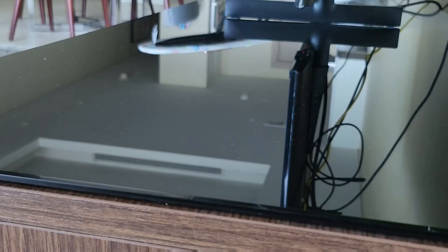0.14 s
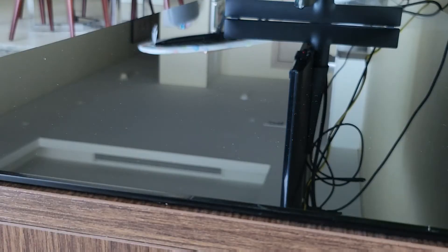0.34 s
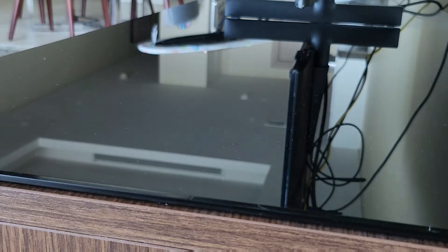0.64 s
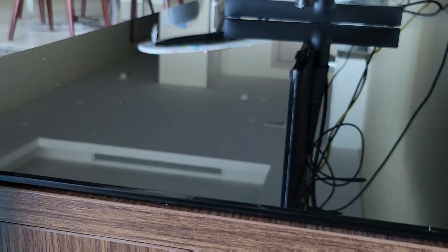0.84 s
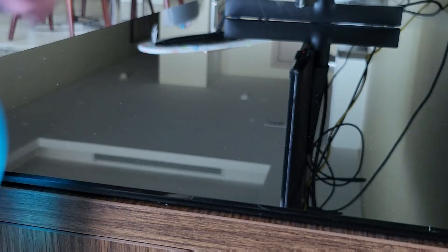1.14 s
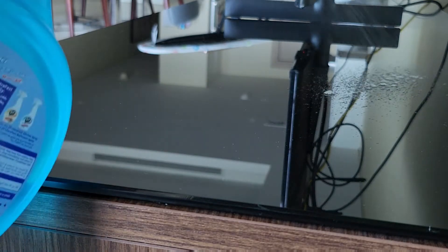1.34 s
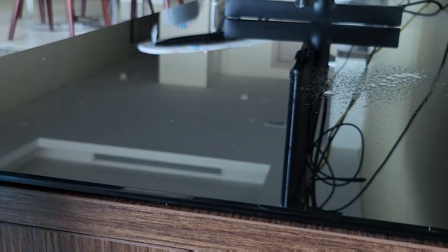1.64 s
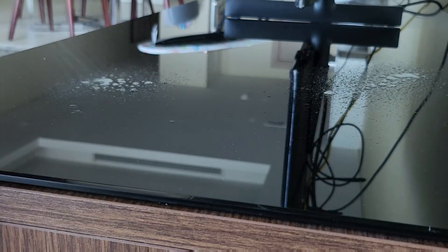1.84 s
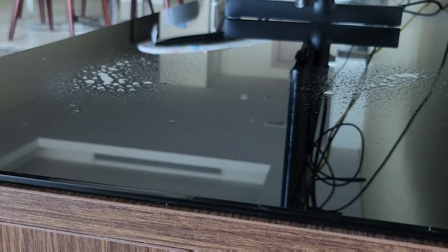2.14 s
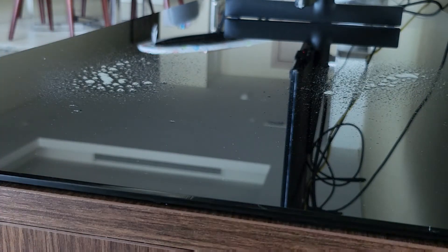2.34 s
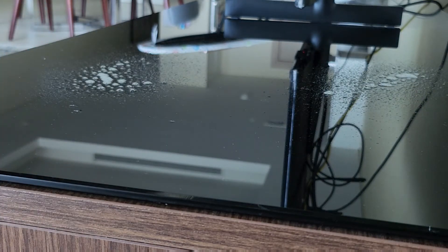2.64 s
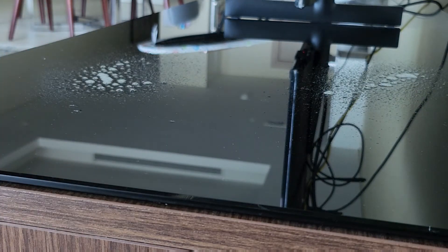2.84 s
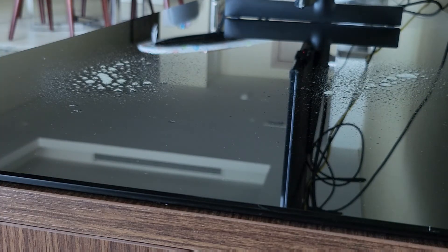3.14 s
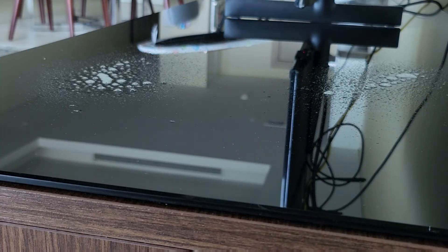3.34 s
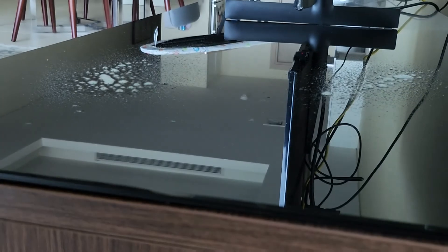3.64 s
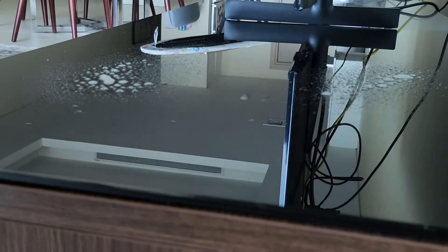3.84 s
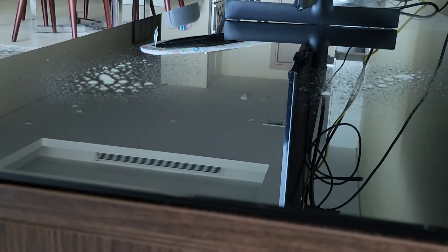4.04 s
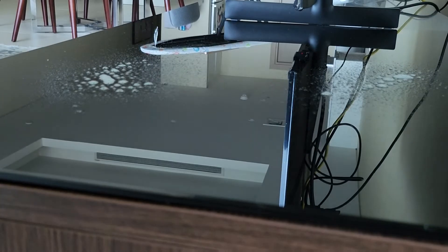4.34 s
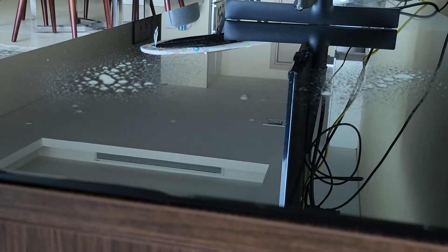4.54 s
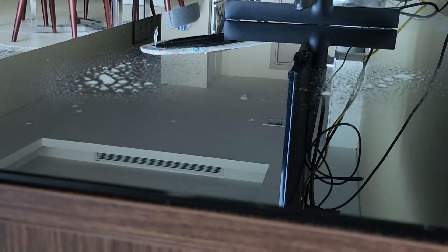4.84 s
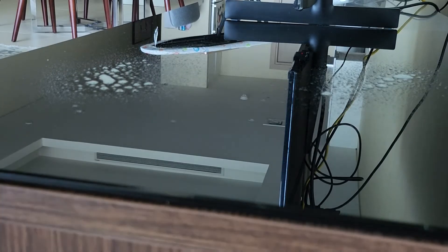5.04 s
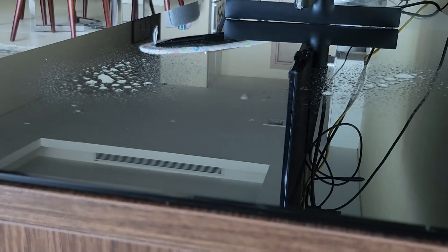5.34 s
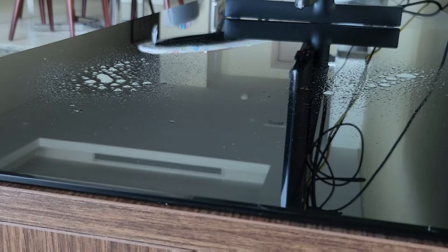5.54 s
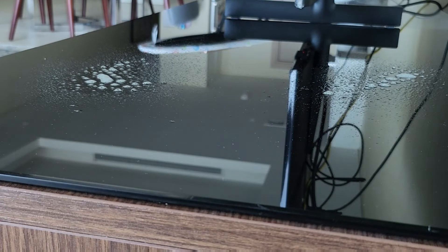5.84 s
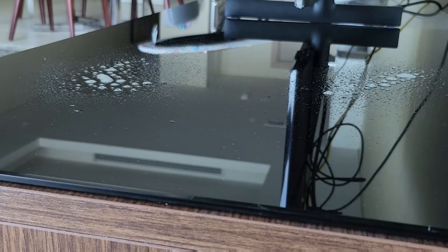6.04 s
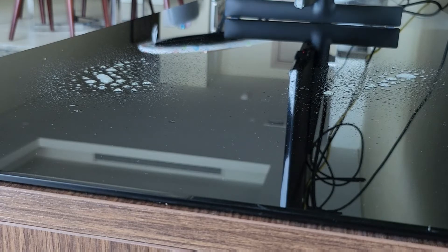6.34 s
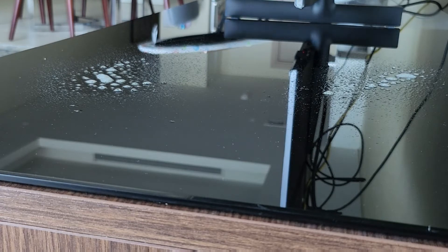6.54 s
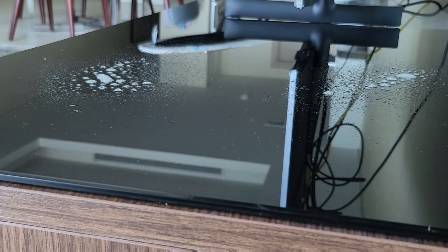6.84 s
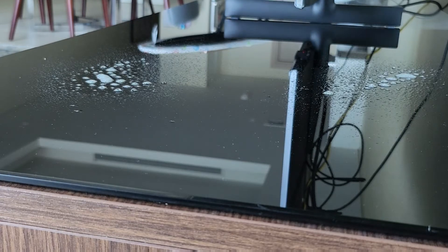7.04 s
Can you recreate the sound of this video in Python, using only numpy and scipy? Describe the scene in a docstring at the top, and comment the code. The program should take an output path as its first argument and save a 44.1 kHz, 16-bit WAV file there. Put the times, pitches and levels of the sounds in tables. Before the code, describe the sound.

A trigger spray bottle spritzes a glass top twice, slightly to the left, its plastic lever clacking back after each hiss. Something crinkly is then handled on the right, with small snaps and pops. Two hollow knocks boom through a piece of furniture, the second with a short rattle. Faint clothing rustle and a low machine hum fill the small room, heard from close by.

```python
"""A small room, where a machine hums low throughout. On the left, a trigger bottle sprays a glass top
twice: the mist is turbulent noise, and the lever clacks back after each stroke. On the right, something
crinkly is handled, its folds and panels buckling in snaps and pops. Two knocks then excite the modes
of the furniture, which booms. Clothes rustle faintly by friction, and the walls add a short echo."""
import sys
import numpy as np
from scipy import signal
from scipy.fft import rfft, irfft, next_fast_len
from scipy.io import wavfile
from scipy.ndimage import uniform_filter1d

SR = 44100
rng = np.random.default_rng(int(sys.argv[2]) if len(sys.argv) > 2 else 0)


def digitize_waveform(pressure):
    """Quantize a signal to 16-bit integers and store it at the path in sys.argv[1].

    Rows of a 2-D input are taken as channels; values are limited to [-1, 1].
    """
    field = np.atleast_2d(pressure).T
    bounded = np.clip(field, -1, 1)
    quanta = np.round(bounded * 32767).astype(np.int16)
    wavfile.write(sys.argv[1], SR, quanta)


N = 317888
TIME = np.arange(N) / SR


def gain_of(db):
    """Amplitude ratio of a level in decibels."""
    return 10 ** (np.asarray(db) / 20)


def unit_rms(x):
    """Normalisation to an rms of 1."""
    return x / np.sqrt(np.mean(x ** 2) + 1e-20)


def curve_at(points, hz):
    """Interpolation on a log-frequency axis."""
    f, value = np.transpose(points)
    return np.interp(np.log(hz + 1), np.log(f + 1), value)


def add(mix, s, sound):
    """Superposition of a sound starting at s seconds."""
    part = mix[round(s * SR):][:len(sound)]
    part += sound[:len(part)]


def coloured_noise(spectrum):
    """Spectral shaping of white noise, at unit rms."""
    size = next_fast_len(N)
    response = gain_of(curve_at(spectrum, np.fft.rfftfreq(size, 1 / SR)))
    return unit_rms(irfft(rfft(rng.standard_normal(N), size) * response, size)[:N])


def blotches(shape, rows, columns):
    """A random field, correlated by a moving average along both axes."""
    field = uniform_filter1d(rng.standard_normal(shape), size=rows, axis=0)
    return unit_rms(uniform_filter1d(field, size=columns, axis=1))


def mode(hz, t60, rise_s):
    """Damped oscillation with a soft onset; t60 is the time to decay by 60 dB."""
    t60 = max(t60, .004)
    t = TIME[:round(t60 * SR)]
    return gain_of(-60 * t / t60) * (1 - np.exp(-t / rise_s)) * np.sin(2 * np.pi * hz * t)


def taps(rows, rise_s, scrape_s):
    """Forced response of single modes, each driven by a brief scrape of noise."""
    out = np.zeros(N)
    for s, db, hz, t60 in rows:
        scrape = rng.standard_normal(300) * gain_of(-60 * TIME[:300] / scrape_s)
        scrape /= np.linalg.norm(scrape)
        add(out, s, gain_of(db) * signal.fftconvolve(mode(hz, t60, rise_s), scrape))
    return out


def placed(x, pan_db, lead_s=0):
    """Level and time differences: the left channel is louder by pan_db and earlier by lead_s."""
    return np.array([x * gain_of(pan_db / 2), np.roll(x, round(lead_s * SR)) / gain_of(pan_db / 2)])


def swell(start, rise, hold, fall, db, sag_db=0, depth_db=30):
    """Exponential rise, sag and fall of an envelope, offset to end at zero."""
    corners = start + np.cumsum([0, rise, hold, fall])
    line_db = np.interp(TIME, corners, [-depth_db, 0, -sag_db, -sag_db - depth_db])
    floor = gain_of(-depth_db - max(sag_db, 0))
    return gain_of(db) * np.maximum(gain_of(line_db) - floor, 0) * (TIME > start)


def rubs(rows):
    """Envelope, second-band level and pan of a series of friction strokes."""
    start, rise, _, _, band_db, pan_db = np.transpose(rows)
    level = sum(swell(s, up, 0, down, db) for s, up, down, db, _, _ in rows)
    return level, np.interp(TIME, start + rise, band_db), np.interp(TIME, start + rise, pan_db)


def grains(per_s, spread_db):
    """Shot noise: an envelope that jumps at random instants and quickly relaxes."""
    jumps = gain_of(spread_db * np.minimum(rng.exponential(1, N), 3)) * (rng.random(N) < per_s / SR)
    return unit_rms(1 + signal.lfilter([1], [1, -np.exp(-1 / (0.00034 * SR))], jumps))


def hiss(level, band_db, pan_db, bursts, main_band, second_band,
         per_s, spread_db, lead_s, coherence, patchy_db, shadow_db):
    """Amplitude-modulated noise in two bands, with bursts, partly coherent between the microphones."""
    main_level = level * grains(per_s, spread_db)
    t, sudden = TIME[:SR // 4], np.zeros(N)
    for s, db, length in bursts:
        attack = np.minimum(t / (.2 * length + .0004), 1)
        add(sudden, s, gain_of(db - 60 * (t / length) ** 2.5) * attack)
    main_level += sudden * grains(per_s=1500, spread_db=3.5)  # each burst is a clump of snaps
    second_level = gain_of(band_db) * (level + 0.44 * sudden)  # smoother, and thin in bursts
    direct, left, right = (main_level * coloured_noise(main_band)
                           + second_level * coloured_noise(second_band) for _ in range(3))
    scattered = placed(np.ones(N), pan_db) * [left, right]
    pair = coherence * placed(direct, pan_db, lead_s) + np.sqrt(1 - coherence ** 2) * scattered
    hz, _, spectra = signal.stft(pair, SR, nperseg=128)
    shadow = shadow_db * np.log2(hz / 4000 + 0.1)[:, None] / 2  # the housing shades one side's treble
    spectra *= gain_of(patchy_db * blotches(spectra.shape[1:], 5, 6) + np.array([shadow, -shadow]))
    return signal.istft(spectra, SR, nperseg=128)[1][:, :N]


# Background spectrum (frequency [Hz], relative density [dB])
AIR_SPECTRUM = [(88, -57), (150, -28), (179, -0.5), (231, -0.5), (254, -10.5), (303, -7), (376, -13.5),
                (457, -8), (624, -14.5), (774, -18.5), (1310, -32), (3420, -40), (4000, -42),
                (12700, -42.5), (16000, -46.5)]
# Likeness of the room's sound at the two microphones (frequency [Hz], correlation [ratio])
ROOM_COHERENCE = [(60, -0.11), (180, 0.9), (550, 0.55), (1650, -0.74), (4970, -0.16), (15000, -0.032)]
# Balance of the background (frequency [Hz], left over right [dB])
AIR_PAN = [(60, 2.5), (240, 3), (950, -8), (3770, 2), (15000, -3)]
def room_air(level_db=-62):
    """Partly coherent ambient noise: a low, drifting wash under a thin hiss."""
    hz = np.fft.rfftfreq(1024, 1 / SR)
    drift = blotches((N // 256 + 5, 513), 30, 6).T
    shared, apart = (signal.stft(coloured_noise(AIR_SPECTRUM), nperseg=1024, noverlap=768)[2]
                     for _ in range(2))
    coherence = curve_at(ROOM_COHERENCE, hz)[:, None]
    pan = gain_of(curve_at(AIR_PAN, hz) / 2)[:, None]
    right = coherence * shared + np.sqrt(1 - coherence ** 2) * apart
    spectra = np.array([shared * pan, right / pan]) * gain_of(1.9 * drift[:, :shared.shape[1]])
    return gain_of(level_db) * unit_rms(signal.istft(spectra, nperseg=1024, noverlap=768)[1][:, :N])


# Swelling and sinking of the rumble (time [s], level [dB])
RUMBLE_LEVEL = [(0.0, -49.5), (0.6, -55.5), (0.92, -51), (1.7, -49.5), (2.11, -56.5), (2.67, -50.5),
                (3.17, -54), (4.73, -50.5), (4.83, -53.5), (6.88, -52.5), (7.2, -53)]
# Rumble spectrum (frequency [Hz], relative density [dB])
RUMBLE_SPECTRUM = [(21, -25.5), (35, 2.5), (102, -1.5), (114, -9), (130, -9.5), (150, -14), (200, -50.5),
                   (330, -120)]
def rumble():
    """Long wavelengths: deep noise reaches both microphones almost in phase."""
    shared, apart = (coloured_noise(RUMBLE_SPECTRUM) for _ in range(2))
    level = gain_of(np.interp(TIME, *np.transpose(RUMBLE_LEVEL)))
    return placed(level * shared, pan_db=-1.5) + 0.17 * level * apart * [[1], [-1]]


# Machine tones (frequency [Hz], bandwidth [Hz], level [dB])
HUM_PARTIALS = [(101.44, 9.4, -62), (188.8, 6.9, -68), (220.8, 5.4, -72), (304.8, 0.73, -70),
                (458.3, 1.3, -75), (524, 3.9, -81), (586, 3.2, -89.5), (758, 1.8, -85), (788, 3, -82),
                (2560, 35, -102), (3330, 5.4, -102)]
def machine_hum():
    """Line broadening: each steady tone wavers randomly in amplitude and phase."""
    out = np.zeros(N)
    for hz, width, db in HUM_PARTIALS:
        pole = np.exp(-np.pi * width / SR)
        waver = signal.lfilter([1], [1, -pole], [1, 1j] @ rng.standard_normal((2, N)))
        core = 1.41 / (1 + hz / 1500)  # high tones are less steady
        phasor = (core + waver / np.std(waver)) * np.exp(2j * np.pi * hz * TIME)
        out += gain_of(db) * unit_rms(phasor.real)
    return placed(out, pan_db=-0.36)


# Fabric strokes (start [s], rise [s], fall [s], level [dB], relative low band [dB], pan [dB])
SWISHES = [(-.06, 0.091, 0.23, -67, -9.5, -6), (.17, 0.033, 0.56, -71.5, -3.5, -2),
           (.5, 0.072, 0.53, -72, -11.5, -1), (.74, 0.068, 0.98, -82, -2.5, -2),
           (1.5, 0.072, 0.34, -73, 1, -1), (2.08, 0.046, 0.51, -74, -2, 0),
           (5.03, 0.036, 1.8, -80.5, -7.5, -5), (5.69, 0.028, 0.25, -75, -6, -2.5),
           (6.238, 0.017, 0.16, -60, -11.5, 1.5), (6.22, 0.12, 0.69, -72.5, -5.5, -1),
           (6.44, 0.014, 0.13, -74.5, 4, -3), (6.45, 0.06, 0.12, -64, -7.5, -0.5),
           (6.83, 0.046, 0.28, -70.5, -7.5, 3)]
# Dry ticks in the rustle (time [s], level [dB], duration [s])
CLOTH_TICKS = [(0.191, -65, 0.0079), (0.266, -61, 0.0065), (0.511, -65, 0.0059), (5.713, -70, 0.0076),
               (6.362, -60, 0.0054), (6.422, -62, .006), (6.458, -70, .006)]
# Upper and lower bands of the rustle (frequency [Hz], relative density [dB])
CLOTH_HIGH_BAND = [(2060, -21), (3500, -30), (4030, 0), (7510, 2), (9680, -1), (11400, 2.5), (15300, -3),
                   (16000, -9.5)]
CLOTH_LOW_BAND = [(760, -12.5), (1300, -10.5), (1610, -12.5), (2120, -17), (3500, -11.5), (4550, -20.5),
                  (7700, -120)]
def clothes():
    """Sliding friction: fabric radiates soft broadband noise as the person moves."""
    return hiss(*rubs(SWISHES), CLOTH_TICKS, CLOTH_HIGH_BAND, CLOTH_LOW_BAND, per_s=92, spread_db=1.5,
                lead_s=.0002, coherence=0.23, patchy_db=2.5, shadow_db=3.0)


# Trigger strokes (start [s], rise [s], hold [s], level [dB], pressure sag over the hold [dB])
SPRAY_STROKES = [(1.116, 0.15, 0.13, -43.5, 8.5), (1.689, 0.044, 0.22, -56, -4.5)]
# Air pockets in the nozzle (time [s], level [dB], duration [s])
NOZZLE_SPITS = [(1.129, -45.5, 0.041), (1.1417, -40.5, 0.025), (1.173, -57, 0.036), (1.1974, -40, 0.022),
                (1.2012, -36, .003), (1.2348, -31, .004), (1.2401, -32.5, 0.016), (1.269, -35, .003),
                (1.271, -43, 0.0093), (1.714, -48, 0.0056), (1.738, -50, 0.0046), (1.743, -44, 0.0094),
                (1.749, -41, 0.017), (1.79, -52, .005), (1.81, -53, 0.0062), (1.83, -41, 0.0052),
                (1.843, -47, 0.041), (1.862, -53, 0.056), (1.9, -48, 0.0068), (1.949, -65, .006),
                (1.983, -57, 0.012)]
# Upper and lower bands of the mist (frequency [Hz], relative density [dB])
MIST_HIGH_BAND = [(2350, -55), (4000, -20.5), (4860, -14), (5320, -12), (5700, -11), (6000, -8),
                  (6300, -10.5), (6730, -13), (7590, -4), (8510, -11), (9820, -9), (11300, -7), (12300, 0),
                  (13300, -3), (14900, -8.5), (15700, -3)]
MIST_LOW_BAND = [(450, -33), (800, -2), (1200, -5.5), (1390, -8), (1800, -2), (2700, -3.5), (3220, 4.5),
                 (3500, -4), (4000, 2), (5200, -45), (8800, -120)]
# Bubbles bursting in the nozzle (time [s], level [dB], frequency [Hz], t60 [s])
NOZZLE_BUBBLES = [(1.293, -42.5, 4900, 0.028), (1.306, -55, 7000, .012), (1.747, -39.5, 3690, 0.04),
                  (1.747, -45, 6330, 0.026), (1.753, -33, 6370, 0.016)]
# Thumps of the flexing bottle wall (time [s], level [dB], frequency [Hz], t60 [s])
WALL_FLEXES = [(1.352, -46, 377, 0.053), (1.376, -50, 350, 0.052), (1.397, -51, 353, 0.046)]
def spray(shut_off_s=0.17, pan_db=2.5):
    """Turbulent jet noise: mist hisses onto the glass, while bubbles and the bottle wall ring briefly."""
    level = sum(swell(s, rise, hold, shut_off_s, db, sag) for s, rise, hold, db, sag in SPRAY_STROKES)
    mist = hiss(level, band_db=-14.5, pan_db=pan_db, bursts=NOZZLE_SPITS,
                main_band=MIST_HIGH_BAND, second_band=MIST_LOW_BAND, per_s=300, spread_db=3.0,
                lead_s=.00043, coherence=0.72, patchy_db=3.5, shadow_db=3.5)
    bubbles = taps(NOZZLE_BUBBLES, rise_s=0.0012, scrape_s=0.0028)
    flexes = taps(WALL_FLEXES, rise_s=0.0017, scrape_s=.0003)
    return mist + placed(bubbles, pan_db, lead_s=0.00044) + placed(flexes, pan_db=1.5)


# Lever impacts (time [s], level [dB], spectral tilt [dB/octave])
LEVER_CLACKS = [(1.1356, -49, -10), (1.59, -43, 6.5), (1.598, -54, 2), (1.664, -53, -1), (1.679, -41.5, -5),
                (2.16, -46, 8), (2.2504, -54.5, 8.5)]
# Lever resonances (frequency [Hz], relative level [dB], t60 [s])
LEVER_MODES = [(615, -7, 0.019), (1520, 0.5, 0.011), (1810, -2, 0.01), (3260, -4, 0.0086),
               (4990, -11, 0.004)]
def trigger():
    """Impact excitation: the plastic lever hits its stop, heard directly and through damped modes."""
    out = np.zeros(N)
    for s, db, tilt_db in LEVER_CLACKS:
        scrape = rng.standard_normal(400) * gain_of(-60 * TIME[:400] / 0.011)
        body = np.zeros(SR // 10)
        for hz, mode_db, t60 in LEVER_MODES:
            add(body, 0, gain_of(mode_db + tilt_db * np.log2(hz / 1500)) * mode(hz, t60, 0.00077))
        add(out, s, gain_of(db - 1.5) * signal.fftconvolve(body, scrape / np.linalg.norm(scrape)))
        add(out, s, gain_of(db - 17.0 + 1.23 * tilt_db) * scrape)
    return placed(out, pan_db=3.8, lead_s=0.00041)


# Envelope of the crackle (time [s], level [dB])
CRACKLE_LEVEL = [(2.695, -92), (2.71, -66), (2.765, -68), (2.802, -56), (2.915, -63.5), (3.056, -64),
                 (3.124, -64.5), (3.165, -52), (3.214, -65), (3.3, -60.5), (3.42, -70.5), (3.6, -73.5),
                 (3.9, -94)]
# Folds giving way (time [s], level [dB], duration [s])
FOLD_SNAPS = [(2.702, -70, 0.016), (2.718, -51, 0.0045), (2.737, -55, 0.012), (2.757, -65, 0.006),
              (2.774, -67, 0.0046), (2.784, -54, 0.007), (2.789, -46, 0.011), (2.794, -45.5, 0.011),
              (2.805, -53, .02), (2.838, -48.5, .012), (2.866, -54, 0.01), (2.891, -54, 0.006),
              (2.904, -69, 0.0046), (2.962, -50, 0.013), (2.967, -47, 0.025), (3.001, -47, 0.014),
              (3.027, -46.5, 0.026), (3.047, -51, 0.012), (3.056, -43.5, 0.019), (3.075, -53, 0.024),
              (3.09, -56, .008), (3.14, -46, 0.018), (3.158, -49, 0.013), (3.172, -49, 0.0042),
              (3.177, -46, 0.011), (3.237, -48, 0.011), (3.245, -48, 0.005), (3.278, -54, 0.016),
              (3.312, -48, 0.02), (3.3541, -45, 0.0042), (3.378, -49, 0.0075), (3.456, -61, 0.016),
              (3.478, -62, 0.011), (3.543, -51.5, 0.0081), (3.824, -67, 0.013)]
# Panels buckling (time [s], level [dB], frequency [Hz], t60 [s], relative overtone [dB])
BUCKLING_POPS = [(2.714, -49.5, 2700, 0.014, -22), (2.74, -44.5, 1340, 0.01, -17),
                 (2.779, -44, 573, 0.021, -12), (2.796, -49.5, 520, 0.024, 7.5),
                 (2.888, -37, 655, 0.011, -8), (2.969, -64, 1330, 0.014, -6),
                 (3.006, -48, 2580, 0.025, -20), (3.003, -39, 640, 0.022, -5),
                 (3.06, -37.5, 2740, 0.02, -15), (3.144, -34.5, 687, 0.019, -4.5),
                 (3.153, -52, 1300, 0.014, -10), (3.163, -42, 2580, 0.023, -17),
                 (3.177, -46, 630, 0.015, -7), (3.24, -50, 505, 0.02, -3), (3.513, -33.5, 574, 0.0045, -5)]
# Upper and lower bands of the crackle (frequency [Hz], relative density [dB])
SHEET_HIGH_BAND = [(1760, -54), (3000, -17), (3970, -14), (5290, -6.5), (6130, -11), (8050, -6.5),
                   (13400, -7), (16000, -13.5)]
SHEET_LOW_BAND = [(290, -3), (500, -3), (650, 0), (839, -3.5), (1450, -5.5), (2110, -9), (2680, -4),
                  (3000, -5), (3900, -9), (6600, -120)]
def crinkling():
    """Buckling: a handled sheet releases elastic energy as crackle, snaps and hollow pops."""
    pops = np.zeros(N)
    for s, db, hz, t60, overtone_db in BUCKLING_POPS:
        overtone = gain_of(overtone_db) * mode(2.07 * hz, t60, 0.0014)
        add(pops, s, gain_of(db) * (mode(hz, t60, 0.00092) + overtone))
    level = gain_of(np.interp(TIME, *np.transpose(CRACKLE_LEVEL), left=-200, right=-200))
    crackle = hiss(level, band_db=-5, pan_db=-9, bursts=FOLD_SNAPS,
                   main_band=SHEET_HIGH_BAND, second_band=SHEET_LOW_BAND, per_s=270, spread_db=2.5,
                   lead_s=-0.00016, coherence=0.28, patchy_db=2.5, shadow_db=3.5)
    return crackle + placed(pops, pan_db=-12.0, lead_s=-0.00023)


# Blows and rebounds
# (time [s], low boom [dB], middle boom [dB], upper boom [dB], rap [dB], rap tilt [dB/octave])
IMPACTS = [(3.979, -56, -51, -54, -40, -0.5), (3.987, -24.5, -41, -49, -60, 1),
           (4.01, -48, -49, -33.5, -42.5, -2.5), (4.579, -60, -59, -61, -50, 8),
           (4.594, -49, -23, -18, -36.5, 6.5), (4.609, -62, -61, -58, -44.5, -4.5),
           (4.627, -47, -19.5, -40, -50, 1), (4.651, -55, -43, -42, -51, 0),
           (4.663, -55, -35, -26.5, -54.5, -8), (4.692, -43, -36, -31.5, -47, -5.5),
           (4.756, -61, -51, -36.5, -59, -8), (6.301, -40, -39, -39.5, -67, 6)]
# Three deep, beating modes of the furniture (frequency [Hz], t60 [s])
CARCASS_MODES = [(73, 0.2), (82, 0.16), (101, 0.17)]
# Resonances of the struck panel (frequency [Hz], relative level [dB], t60 [s])
PANEL_MODES = [(213.2, -5, 0.37), (273, -3, 0.12), (432.3, 2, 0.056), (528, 3.5, 0.025), (760, -10, 0.073),
               (1114, -19.5, 0.032), (1320, -11, 0.015), (1890, -10.5, 0.018), (2310, -15.5, 0.019),
               (2950, -27, 0.02)]
# Scuffs of the thing set down (start [s], rise [s], fall [s], level [dB], relative treble [dB], pan [dB])
SCUFF_STROKES = [(3.975, 0.005, 0.15, -52.5, -19.5, 1), (4.42, 0.15, 0.022, -78.5, 12.5, 2),
                 (4.574, 0.01, 0.086, -50.5, 1.5, 1), (4.59, 0.0052, 0.12, -45.5, -12, -1.5),
                 (4.6, 0.056, 0.26, -54, -13.5, 2), (4.66, 0.033, 0.095, -55.5, -16, 0.5)]
# Lower and upper bands of the scuffs (frequency [Hz], relative density [dB])
SCUFF_LOW_BAND = [(530, 0.5), (900, -10.5), (988, -6.5), (1430, -11.5), (2300, -14), (2700, -18.5),
                  (4000, -25.5), (5200, -28), (8800, -120)]
SCUFF_HIGH_BAND = [(2350, -4.5), (4000, -7.5), (6550, -9), (12800, -14.5), (14800, -16), (16000, -25)]
# Loose parts chattering (time [s], level [dB], frequency [Hz], t60 [s])
LOOSE_PARTS = [(4.58, -46, 1830, 0.026), (4.605, -49, 1740, .03), (4.616, -41, 1700, 0.024),
               (4.63, -53, 2450, .018), (4.643, -50, 1850, .018), (4.651, -51, 2290, .03),
               (4.668, -53, 2080, 0.024), (4.678, -57, 1830, .02), (4.694, -51, 1960, .03),
               (4.703, -55, 1130, 0.031)]
def knocks(boom_lag_s=0.0021):
    """Modal response: each blow raps the panel at once, and the deep carcass modes follow."""
    out = np.zeros(N)
    for s, *booms_db, rap_db, tilt_db in IMPACTS:
        for db, (hz, t60) in zip(booms_db, CARCASS_MODES):
            add(out, s + boom_lag_s, gain_of(db) * mode(hz, t60, 0.0051))
        for hz, db, t60 in PANEL_MODES:
            add(out, s, gain_of(rap_db + db + tilt_db * np.log2(hz / 700)) * mode(hz, t60, 0.0008))
    scuff = hiss(*rubs(SCUFF_STROKES), [], SCUFF_LOW_BAND, SCUFF_HIGH_BAND, per_s=240, spread_db=-1.5,
                 lead_s=-0.00024, coherence=0.63, patchy_db=1.0, shadow_db=1.5)
    chatter = taps(LOOSE_PARTS, rise_s=.0005, scrape_s=.015)
    return placed(out + chatter, pan_db=.2) + scuff


# Faint tones that swell and fade (start [s], duration [s], frequency [Hz], level [dB])
FAINT_TONES = [(4.238, 0.15, 3200, -86), (4.73, 0.027, 1060, -62), (4.757, 0.063, 1084, -65),
               (4.863, 0.097, 1100, -73)]
def faint_tones():
    """Random amplitude modulation blurs the pitch of short, soft tones."""
    out = np.zeros(N)
    for s, length, hz, db in FAINT_TONES:
        t = TIME[:round(length * SR)]
        unsteady = .5 + .8 * unit_rms(uniform_filter1d(rng.standard_normal(SR // 2), size=350))[:len(t)]
        arch = np.sin(np.pi * (t / length) ** 0.5)
        add(out, s, gain_of(db) * arch * unsteady * np.sin(2 * np.pi * hz * t))
    return placed(out, pan_db=.5)


# Reverberation time of the room (frequency [Hz], t60 [s])
ROOM_T60 = [(200, 0.38), (1000, 0.1), (5000, 0.27), (15000, 0.04)]
def reverberation(x):
    """Convolution with sparse wall reflections of random sign, each band decaying at its own rate."""
    echoes = np.zeros((2, SR // 2))
    slots = np.arange(200, SR // 2 - 20, 20)
    arrivals = slots + rng.integers(0, 20, (2, len(slots)))
    np.put_along_axis(echoes, arrivals, rng.choice([-1., 1.], arrivals.shape), 1)
    hz, t, (left, apart) = signal.stft(echoes, SR, nperseg=256)
    coherence = np.clip(curve_at(ROOM_COHERENCE, hz), 0, 1)[:, None]  # long waves arrive alike
    right = coherence * left + np.sqrt(1 - coherence ** 2) * apart
    decay = gain_of(-60 * t / curve_at(ROOM_T60, hz)[:, None])
    tail = signal.istft(np.array([left, right]) * decay, SR, nperseg=256)[1]
    return signal.fftconvolve(x.mean(0)[None], tail / np.linalg.norm(tail[0]), axes=1)[:, :N]


def scene():
    """Superposition of direct sound, its reflections and the room's background."""
    near = spray() + crinkling() + clothes() + faint_tones()
    clacks, thuds = trigger(), knocks()
    thud_echoes = gain_of(-20) * reverberation(thuds)
    echoes = reverberation(gain_of(-7.5) * near + gain_of(-11) * clacks)
    return near + clacks + thuds + echoes + thud_echoes + room_air() + rumble() + machine_hum()


LOW_CUT_HZ, HIGH_CUT_HZ = 36, 15750
def record(dry):
    """Band limiting: the microphones lose the deepest bass, and a low-pass removes the top treble."""
    thin = signal.sosfilt(signal.butter(6, LOW_CUT_HZ, "high", fs=SR, output="sos"), dry)
    low_pass = signal.firwin(511, HIGH_CUT_HZ, window=("kaiser", 9), fs=SR)
    return signal.oaconvolve(thin, low_pass[None], "same")


dry = scene()
out = record(dry)
digitize_waveform(out)
```